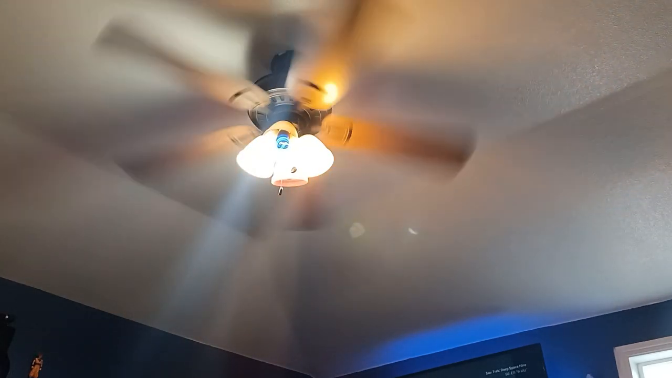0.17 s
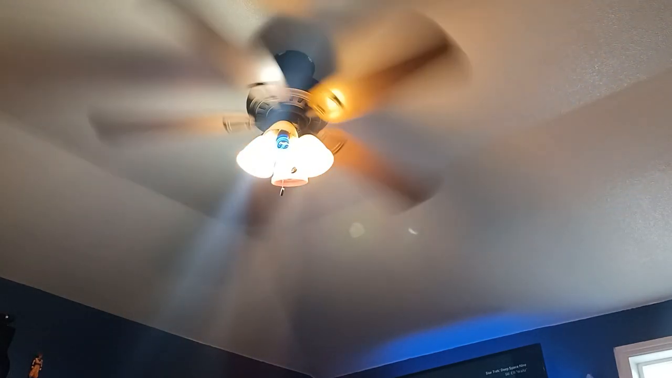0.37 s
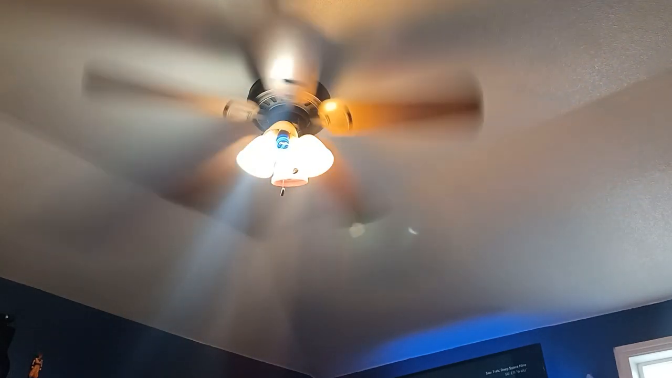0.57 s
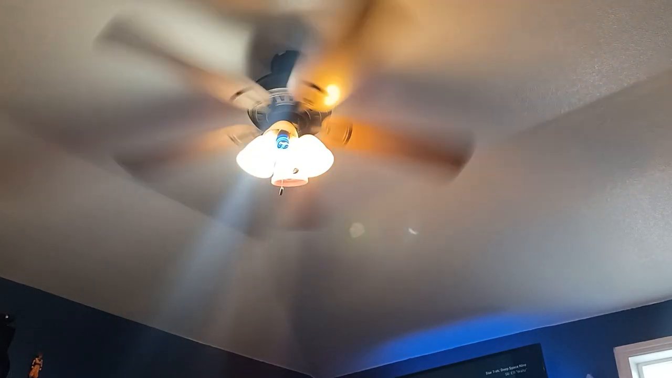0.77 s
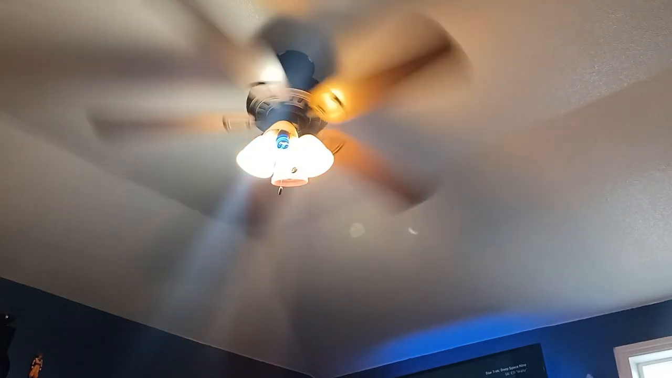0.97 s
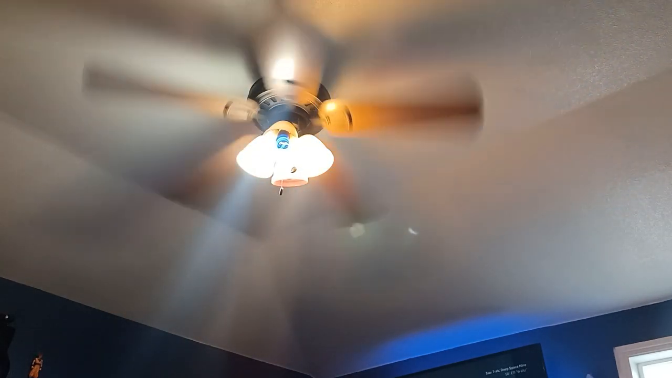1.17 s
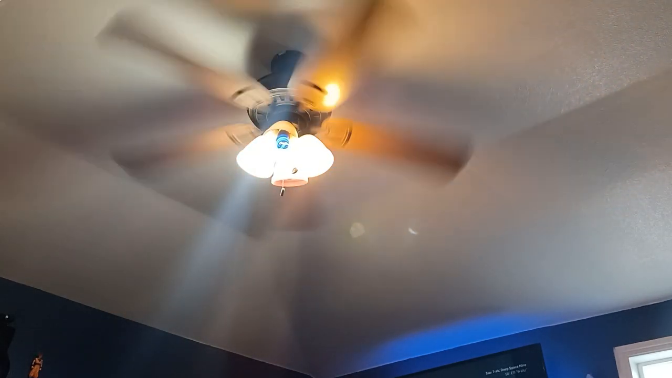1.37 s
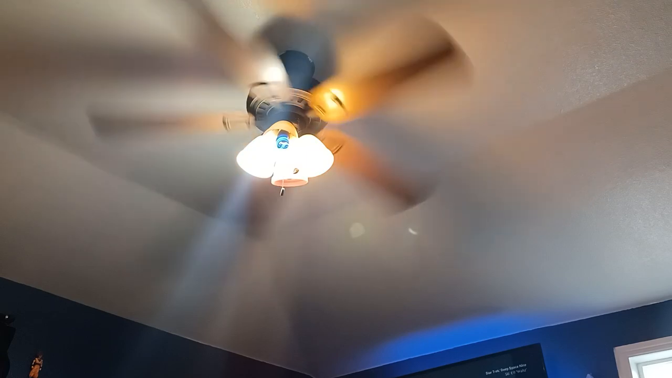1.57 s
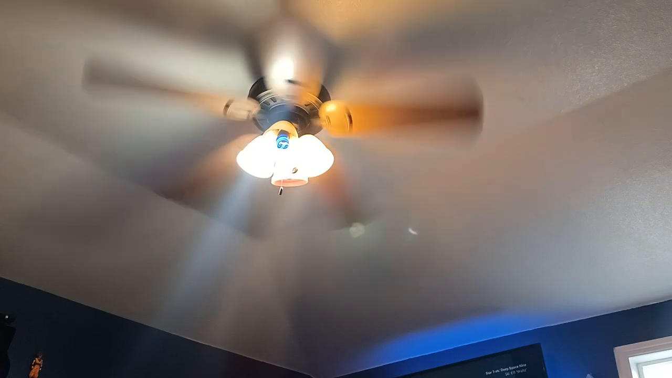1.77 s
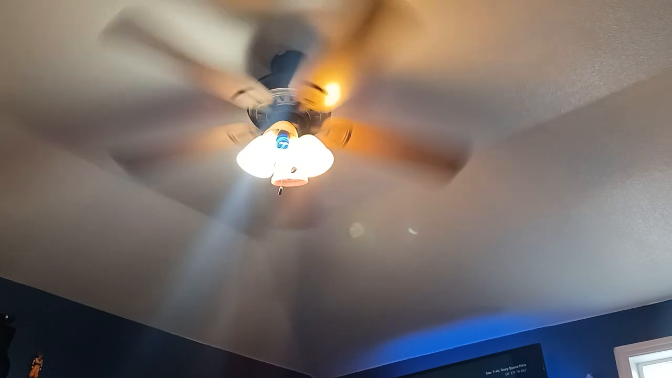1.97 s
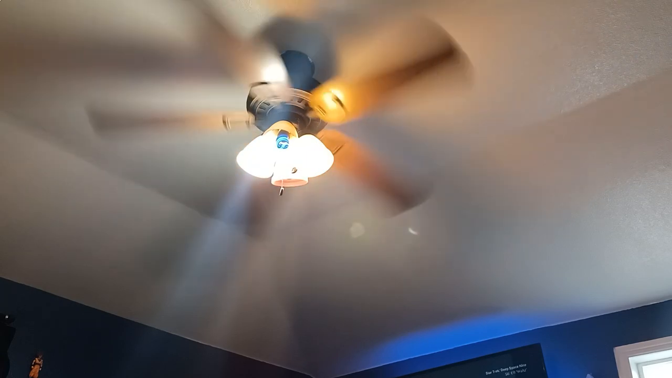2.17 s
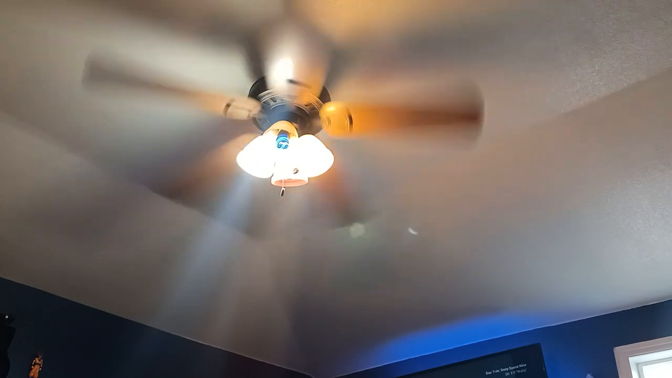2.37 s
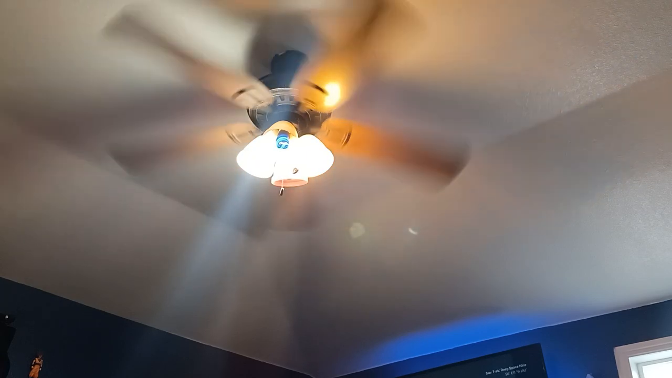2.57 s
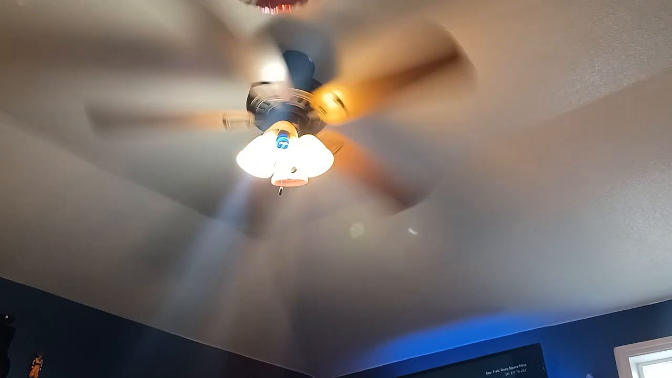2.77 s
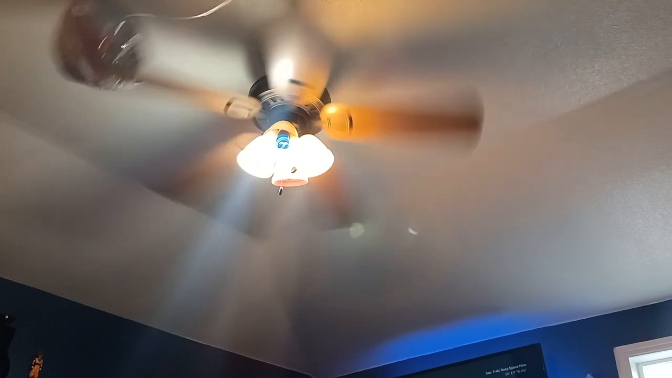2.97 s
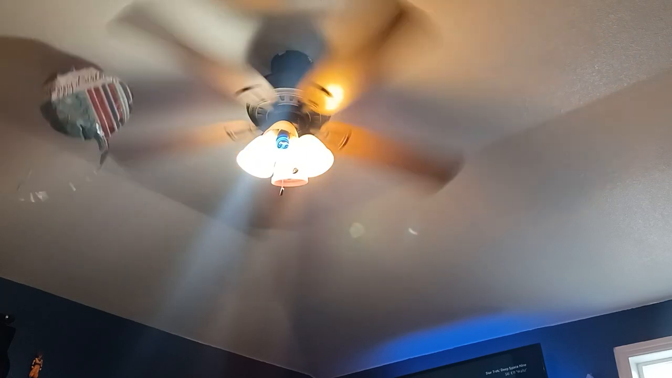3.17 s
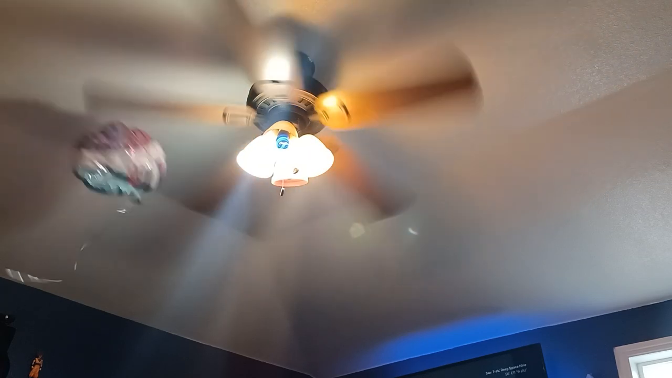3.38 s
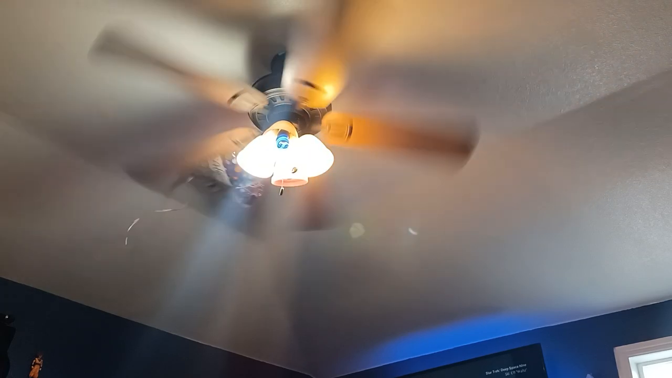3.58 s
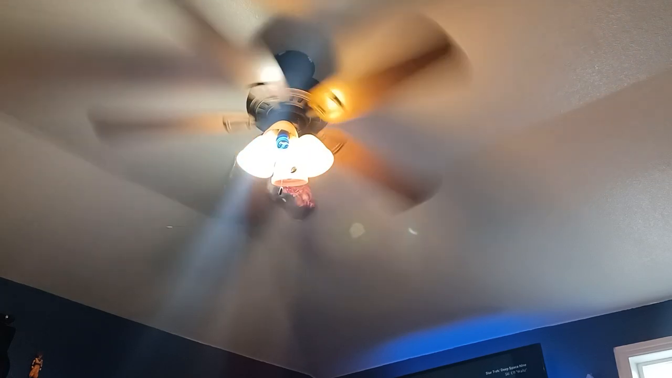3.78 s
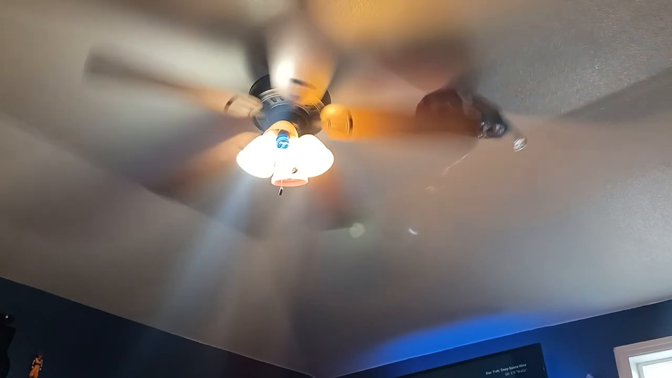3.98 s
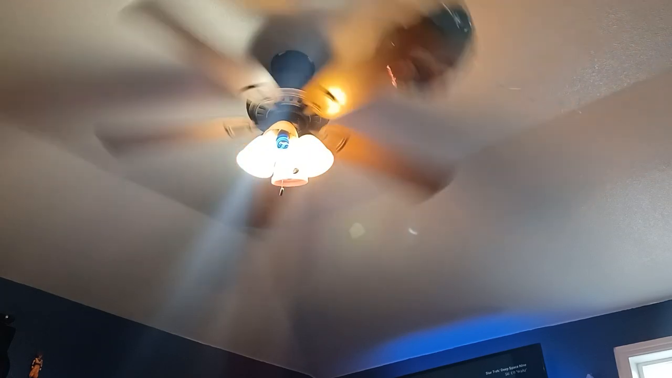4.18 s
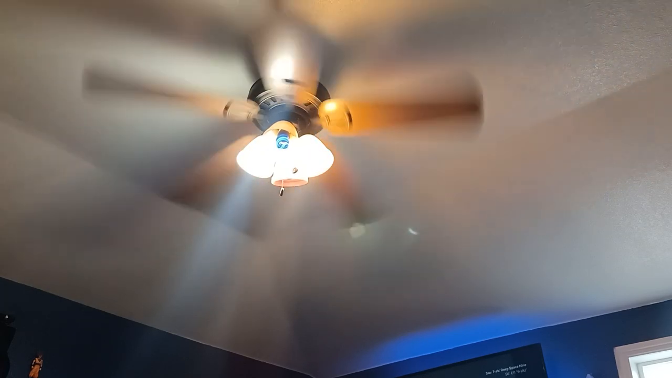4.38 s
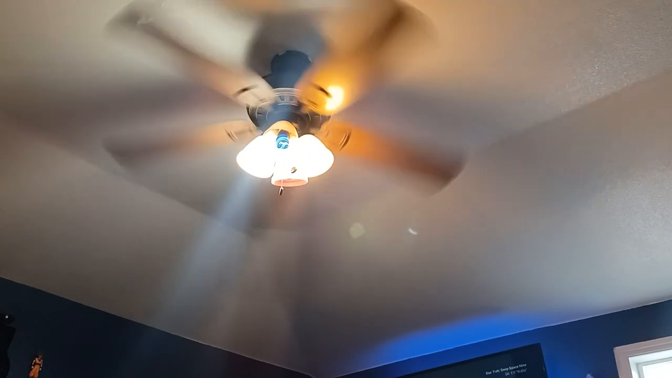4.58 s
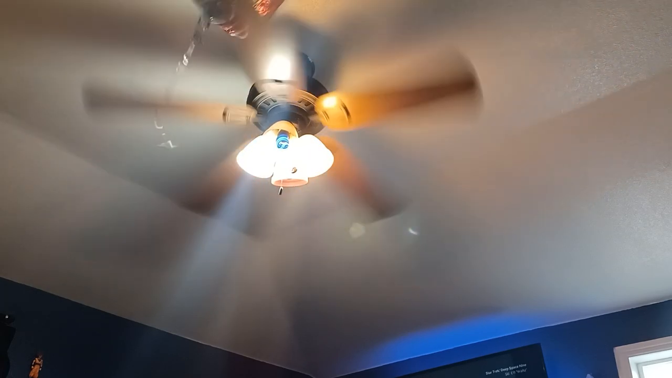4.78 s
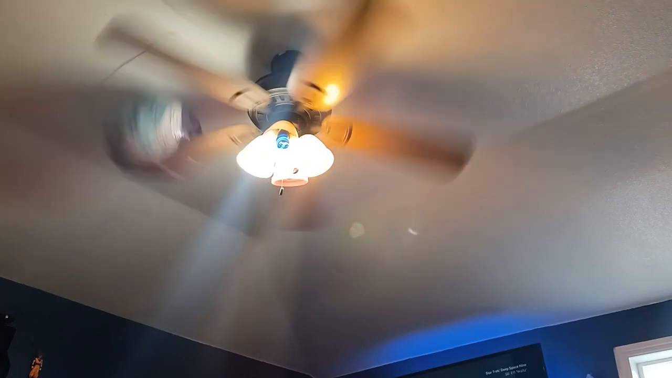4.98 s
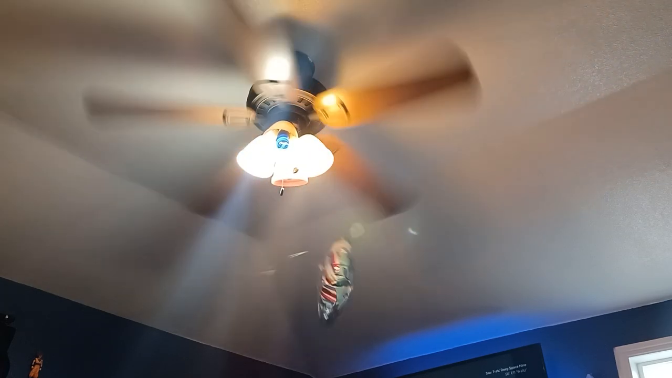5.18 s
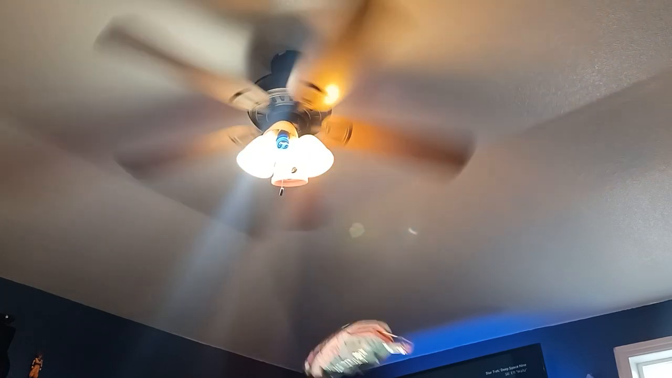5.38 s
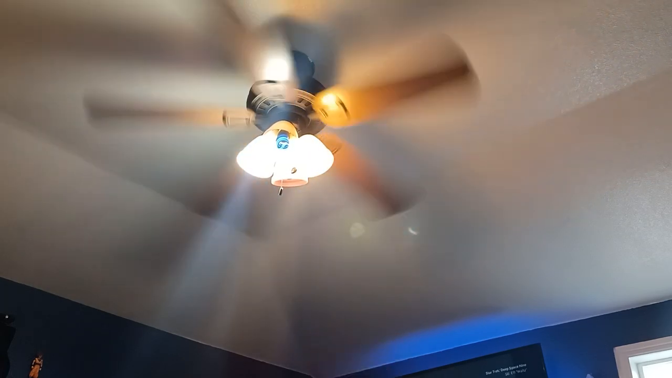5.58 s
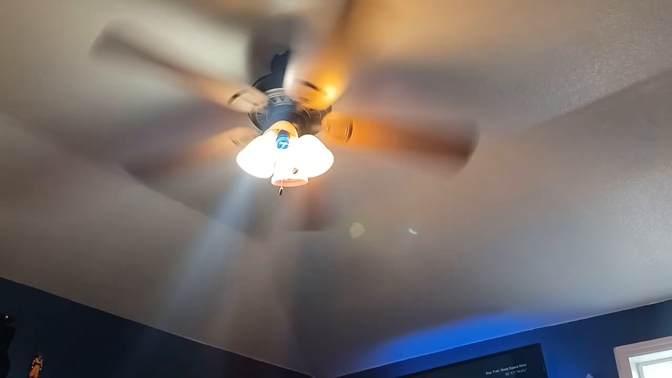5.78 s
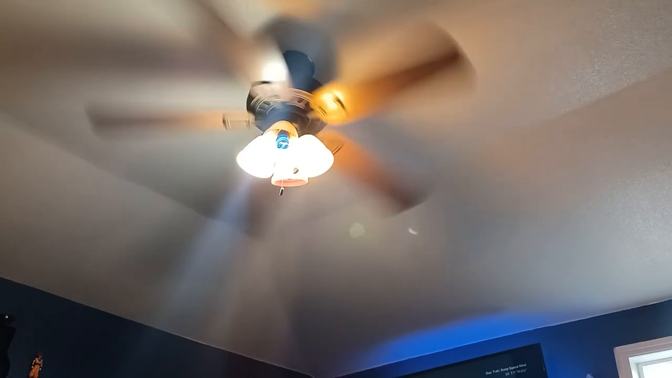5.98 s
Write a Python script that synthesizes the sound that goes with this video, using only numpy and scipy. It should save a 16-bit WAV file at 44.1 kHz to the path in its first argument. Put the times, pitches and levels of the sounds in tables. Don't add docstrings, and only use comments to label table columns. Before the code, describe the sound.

A faint low fan hum and soft air rush run throughout in a small bedroom, heard by a handheld phone. At 0.1 s a dull dry scuff and handling thump, then foil rustles until 0.3 s and a tiny bright tick at 0.35. Sparse ticks and a small snap at 0.8 lead to denser crinkling at 1.0-1.5 and again at 1.85-2.1 s, followed by faint sliding hiss. Light grazes begin at 2.7; at 2.85-3.0 the blades strike in a loud, sharp crackling volley with hollow booms. More smacks come at 3.35-3.5, 3.7-3.85 and 4.0, then a deep, strong whack at 4.17 with a weaker slap at 4.3. Thin crinkles fill 4.4-4.7, a last hard double burst lands at 4.8-4.95, and light grazes follow at 5.05-5.16. Faint rustling and hiss around 5.4-5.6 sink into near-silent fan murmur by 6 s.

```python
import sys
import numpy as np
from scipy import signal
from scipy.fft import rfft, irfft, next_fast_len
from scipy.io import wavfile
from scipy.ndimage import uniform_filter1d

SR = 44100
rng = np.random.default_rng(int(sys.argv[2]) if len(sys.argv) > 2 else 0)


def file_out(sig):
    cols = np.atleast_2d(sig).T
    lim = np.clip(cols, -1, 1)
    pcm = np.round(lim * 32767).astype(np.int16)
    wavfile.write(sys.argv[1], SR, pcm)


def field_ratio(decibels):
    return 10 ** (np.asarray(decibels, dtype=float) / 20)


N = 266672
SIZE = next_fast_len(N + SR)
HZ = np.maximum(np.arange(SIZE // 2 + 1) * SR / SIZE, 1)


def rms_one(x):
    return x / np.sqrt(np.mean(x ** 2) + 1e-20)


def at_hz(points, hz=HZ):
    freqs, values = np.transpose(points)
    return np.interp(np.log(hz), np.log(freqs), values)


def at_time(points, t):
    return np.interp(t, *np.transpose(points))


def band_pass(x, order, low_hz, high_hz):
    sos = signal.butter(order, [low_hz, high_hz], "band", fs=SR, output="sos")
    return signal.sosfilt(sos, x)


def colour(x, spectrum):
    return irfft(rfft(x, SIZE) * rms_one(field_ratio(at_hz(spectrum))), SIZE)[..., :N]


def resonance(x, hz, width_hz):
    r = np.exp(-np.pi * width_hz / SR)
    gain = (1 - r * r) / 2
    return signal.lfilter([gain, 0, -gain], [1, -2 * r * np.cos(2 * np.pi * hz / SR), r * r], x + 1e-18)


def drift(rate):
    steps = rng.standard_normal(400)
    return np.interp(np.arange(N) / SR * rate, np.arange(400), steps)


def diffuse(count, size=SIZE):
    # (frequency [Hz], left-right coherence [0 to 1])
    likeness = [(60, 0.9), (200, 0.98), (500, 0.78), (1000, 0.28), (2000, 0.0088), (12000, 0.0086)]
    mid, side = rfft(rng.standard_normal((2, count)), size)
    alike = np.clip(at_hz(likeness, np.arange(1, size // 2 + 2) * SR / size), 0, 1)
    spectra = np.sqrt(1 + alike) * mid + np.sqrt(1 - alike) * side * [[1], [-1]]
    return irfft(spectra, size)[:, :count] / np.sqrt(2)


def sides(pan_db):
    return field_ratio(np.array([[pan_db / 2], [-pan_db / 2]]))


def grains(per_s, spread_db, apart):
    sizes = field_ratio(spread_db * np.minimum(rng.exponential(1, (3, N)), 4)) * rng.choice([-1, 1], (3, N))
    clicks = sizes * (rng.random((3, N)) < per_s / SR)
    return rms_one(clicks[0] + apart * clicks[1:])


def contacts():
    # (time [s], skin level [dB], crinkle above skin [dB], length [s])
    rustles = [(0.068, -54, -6, 0.023), (0.167, -30.5, -10.5, 0.052), (0.211, -26.5, -12, 0.023),
               (0.235, -33.5, -8.5, 0.1), (0.432, -48.5, -3.5, 0.09), (0.587, -62, 2, 0.11),
               (0.819, -41.5, -34, 0.0054), (0.849, -42, -41, 0.0097), (0.91, -51.5, -43, 0.038),
               (1.037, -53, -8, 0.019), (1.063, -53.5, -4, 0.028), (1.195, -44.5, 1.5, 0.027),
               (1.211, -35, -5.5, 0.062), (1.293, -37.5, -0.5, 0.019), (1.372, -43.5, -1.5, 0.038),
               (1.452, -42.5, -32, 0.0081), (1.498, -66, 0, 0.088), (1.86, -42.5, -28, 0.024),
               (1.884, -42.5, -5.5, 0.045), (1.943, -38.5, -3, 0.11), (2.087, -37.5, -13, 0.013),
               (2.23, -58, -6, 0.091), (2.423, -54.5, -13, 0.07), (2.56, -54.5, -28.5, 0.077),
               (2.646, -45.5, -26, 0.028), (3.075, -40.5, -5, 0.042), (3.154, -54, 3.5, 0.044),
               (3.274, -53, -1, 0.03), (4.393, -40, -6.5, 0.05), (4.566, -55, 2.5, 0.014),
               (5.398, -57.5, -15, 0.073), (5.485, -59, -14.5, 0.076), (5.583, -69, -23, 0.056)]
    # (time [s], skin level [dB], thump above skin [dB], length [s])
    blows = [(2.703, -32, -14, 0.031), (2.774, -32.5, -24, 0.038), (2.847, -12, -22, 0.025),
             (2.923, -13, -15, 0.025), (2.961, -14, -10.5, 0.034), (3.353, -9, -9, 0.002),
             (3.427, -12, -23, 0.016), (3.461, -11.5, -20.5, 0.016), (3.724, -20.5, -12, 0.025),
             (3.795, -21.5, -7, 0.018), (3.814, -11, -11, 0.021), (3.847, -21.5, -9, 0.034),
             (3.95, -30.5, -3.5, 0.012), (3.991, -15, -33.5, 0.0078), (4.086, -34.5, -12.5, 0.021),
             (4.158, -18, -2, 0.0098), (4.168, -8, -7, 0.017), (4.223, -27, -9.5, 0.006),
             (4.319, -25, -19, 0.011), (4.588, -37, -9, 0.019), (4.615, -35.5, -26.5, 0.058),
             (4.71, -31, -22.5, 0.042), (4.807, -14, -16.5, 0.016), (4.9, -10.5, -6, 0.026),
             (4.923, -19.5, -8, 0.04), (5.058, -29.5, -10.5, 0.062), (5.151, -33, -23, 0.015),
             (5.159, -24, -25, 0.022)]
    # (time [s], level [dB])
    slack = [(2.7, 3), (2.77, -7), (2.85, 4), (2.93, -0.5), (2.97, -3.5), (3.35, 2), (3.43, 4.5),
             (3.47, -1), (3.72, 2), (3.81, -1.5), (3.99, 2.5), (4.08, 5), (4.16, -3.5), (4.32, 0.5),
             (4.6, 3.5), (4.8, 0.5), (4.9, -0.5), (5.15, 1.5)]
    # (time [s], left over right [dB])
    place = [(0, -8), (0.5, -2), (0.9, -1.5), (2.0, -0.5), (3.0, -4), (3.5, -3.6), (4.2, -3), (5.2, -3.5),
             (6.05, -1.5)]
    faint_from_db, faint_pan, faint_thump = -39.5, 0.18, 0.13
    rustle_thump_db = -14.5
    blow_crinkle_db, crinkle_lags = -19.5, 0.21
    rows = []
    for s, db, crinkle_db, length in rustles:
        thump_db = rustle_thump_db + faint_thump * max(faint_from_db - db, 0)
        rows.append((s, db, thump_db, crinkle_db, length))
    for s, db, thump_db, length in blows:
        crinkle_db = blow_crinkle_db - crinkle_lags * db + at_time(slack, s)
        rows.append((s, db, thump_db, crinkle_db, length))
    return [(s, db, thump_db, crinkle_db,
             at_time(place, s) + faint_pan * max(faint_from_db - db, 0), length)
            for s, db, thump_db, crinkle_db, length in rows]


def wash(fall_s):
    rise_s, follows = 0.005, 0.85
    t, power = np.arange(0, N, 64) / SR, 1e-14
    for s, skin_db, *_, length in contacts():
        since = np.maximum(t - s, 0)
        shape = (1 - np.exp(-since / rise_s)) ** 2 * np.exp(-since / fall_s)
        power = power + field_ratio(2 * skin_db) * length / 0.029 * shape
    return np.interp(np.arange(N) / SR, t, power ** (follows / 2))


def fan():
    # (time [s], level [dB])
    passed_points = [(0, 5), (0.4, 3), (0.64, 5.5), (0.96, 1), (1.33, 4.5), (1.6, 3.5), (1.83, 5.5),
                     (2.05, 11), (2.3, 1.5), (2.75, 4), (3.2, 8.5), (3.6, -6.5), (4.2, -9), (4.5, 5.5),
                     (5.25, -4.5), (5.66, -4.5), (6.05, -8)]
    # (time [s], peak level [dB], half length [s])
    drone_swells = [
        (0.01, -58, 0.073),
        (0.62, -59, 0.22),
        (1.335, -51.5, 0.1),
        (2.046, -57.5, 0.079),
        (2.5, -64, 0.095),
        (2.726, -62, 0.042),
        (3.31, -55.5, 0.067),
        (3.596, -48.5, 0.025),
        (5.513, -60, 0.036),
    ]
    # (frequency [Hz], density [dB per Hz])
    air_spectrum = [(15, -53.5), (25, -39), (65, -13), (108, -10), (137, -5.5), (168, -6.5), (231, 1.5),
                    (547, -10.5), (642, -19.5), (1190, -16), (3000, -39), (3900, -64.5), (6600, -120)]
    # (frequency [Hz], density [dB per Hz])
    hiss_spectrum = [(1500, -26), (2300, -10.5), (3400, -13.5), (4300, -6), (6300, -11), (7200, -14),
                     (11800, -20), (15800, -11)]
    t = np.arange(N) / SR
    passed_db, swell = at_time(passed_points, t), wash(fall_s=0.034)

    hum_db = -62.5 + 0.24 * passed_db - 6 * np.clip((t - 2.95) / 0.17, 0, 1)
    hum = np.sqrt(2) * np.sin(2 * np.pi * 121 * t + 0.36 * drift(12.0))
    hum = field_ratio(hum_db + 3.5 * drift(29)) * hum

    noise = diffuse(N)
    drone = rms_one(resonance(resonance(noise, 229, 28), 229, 28))
    swells = sum(field_ratio(db) * np.exp(-((t - s) / half) ** 2) for s, db, half in drone_swells)
    drone = np.hypot(field_ratio(-80 + passed_db) + swells, field_ratio(-45) * swell) * drone

    air_gain = np.hypot(field_ratio(-61.5 + passed_db), field_ratio(-20.5) * swell)
    air = air_gain * field_ratio(2 * drift(8.8)) * colour(noise, air_spectrum)

    settling = field_ratio(-53) * wash(fall_s=0.01) ** .5
    hiss_gain = np.hypot(field_ratio(-75.5 + 1.5 * passed_db), field_ratio(-17.5) * swell + settling)
    hiss = hiss_gain * field_ratio(2 * drift(2.47)) * colour(diffuse(N), hiss_spectrum)
    return hum + drone + air + hiss


def scuffs():
    # (time [s], peak level [dB])
    jerks = [
        (0.07, -31.5),
        (0.077, -33.5),
        (0.093, -38),
        (0.107, -41.5),
        (0.124, -51),
    ]
    envelope = np.zeros(N)
    for s, peak_db in jerks:
        t, at = np.arange(SR // 10) / SR, round(s * SR)
        envelope[at:at + len(t)] += field_ratio(peak_db - 17.5) * np.exp(-t / 0.037)
    return 4 * band_pass(envelope * grains(2900, 2.7, apart=0.57), 4, 350, 1300)


def ribbon():
    # (time [s], level [dB], length [s])
    slides = [
        (0.06, -61, 0.063),
        (1.597, -68, 0.079),
        (2.263, -62.5, 0.14),
        (2.426, -65, 0.074),
        (2.65, -78, 0.046),
        (5.428, -64.5, 0.16),
    ]
    t = np.arange(N) / SR
    envelope = 0
    for s, db, length in slides:
        shape = np.clip(np.minimum((t - s) / 0.014, (s + length - t) / 0.07 + 1), 0, 1)
        envelope = envelope + field_ratio(db) * shape ** 2
    hiss = rms_one(band_pass(rng.standard_normal((2, N)), 4, 4400, 6900))
    return envelope * field_ratio(2 * drift(30)) * hiss


def brushes():
    # (time [s], level [dB], top frequency [Hz], length [s])
    passes = [(0.815, -49.5, 3800, 0.033), (1.063, -54, 6500, 0.043), (1.86, -46.5, 3150, 0.074),
              (1.947, -45.5, 3370, 0.066), (2.025, -49, 3470, 0.08), (1.223, -45, 3500, 0.096),
              (2.304, -70, 2000, 0.28), (2.929, -25, 2200, 0.026), (3.196, -64, 2000, 0.055),
              (3.43, -29.5, 2200, 0.045), (4.031, -41, 2200, 0.037), (4.446, -62, 2200, 0.12),
              (4.896, -24, 2150, 0.023), (5.102, -42, 1800, 0.034), (4.59, -62, 2200, 0.08),
              (5.396, -70, 1900, 0.14)]
    out, crackle = np.zeros((2, N)), grains(6000, 2.8, apart=2.3)
    for s, db, top_hz, length in passes:
        t, at = np.arange(SR // 3) / SR, round(s * SR)
        shape = np.minimum(t / (0.48 * length), 1) * np.exp(-np.maximum(t - length, 0) / 0.056)
        muffled = rms_one(band_pass(crackle[:, at:at + len(t)], 3, 500, top_hz))
        out[:, at:at + len(t)] += field_ratio(db) * shape * muffled
    return out * sides(2.56)


def knocks():
    # (time [s], peak level [dB], frequency [Hz])
    pushes = [(0.093, -39.5, 128), (0.218, -41, 83.5), (1.058, -37.5, 108), (1.08, -41.5, 131),
              (1.1, -44, 83.5), (1.23, -47, 78), (1.3, -45, 116), (1.35, -51.5, 78), (2.861, -51.5, 125),
              (2.987, -29.5, 122.6), (3.354, -37.5, 68.6), (3.46, -33.5, 79.8), (3.485, -33, 76),
              (3.52, -40.5, 76), (3.826, -35, 85), (4.174, -38, 69), (4.904, -36, 88.5),
              (5.18, -52.5, 100.9)]
    out = np.zeros(N)
    rumble = rms_one(band_pass(rng.standard_normal(N), 3, 60, 210))
    for s, peak_db, hz in pushes:
        t, at = np.arange(SR // 4) / SR, round(s * SR)
        turns = hz * (t + 0.0033 * (1 - np.exp(-t / 0.023)))
        body = np.sin(2 * np.pi * turns) + 2.3 * rumble[at:at + len(t)]
        out[at:at + len(t)] += field_ratio(peak_db + 10.0) * t / 0.078 * np.exp(-t / 0.015) * body
    return out


def booms():
    # (time [s], peak level [dB])
    hits = [(2.858, -34.5), (2.945, -17), (2.979, -22), (3.011, -23.5), (3.351, -24.5), (3.431, -23.5),
            (3.46, -18.5), (3.505, -26), (3.73, -33), (3.8, -33), (3.82, -16), (4.169, -12), (4.206, -14.5),
            (4.814, -23.5), (4.903, -17), (4.92, -22), (4.941, -15)]
    out = np.zeros(N)
    for s, peak_db in hits:
        t, at = np.arange(SR // 3) / SR, round(s * SR)
        envelope = (1 - np.exp(-t / 0.0027)) * np.exp(-t / 0.032)
        out[at:at + len(t)] += field_ratio(peak_db) * envelope * np.sin(2 * np.pi * 228 * t)
    return out * sides(3.1)


def crumpling():
    # (frequency [Hz], width [Hz], level [dB])
    gas_modes = [(235, 15, 1), (289, 70, -1.5), (386, 240, -4), (522, 189, -3)]
    # (frequency [Hz], density [dB per Hz])
    skin_spectrum = [(150, -25.5), (300, -2.5), (600, -3), (900, -3.5), (1500, -4.5), (2050, -8),
                     (2400, -12), (3500, -16.5), (7000, -32.5), (12000, -48.5)]
    # (frequency [Hz], density [dB per Hz])
    crinkle_spectrum = [(880, -5.5), (1500, -1), (1880, 3), (2120, -2.5), (2410, 0), (4180, -3.5),
                        (6640, -1), (7700, -10.5), (12600, 1), (15800, -8.5)]
    power = np.zeros((3, 2, N))
    for s, skin_db, thump_db, crinkle_db, pan_db, length in contacts():
        length, at = max(length, .003), round(s * SR)
        t = np.arange(min(SR // 2, N - at)) / SR
        swell = np.minimum(t / (0.36 * length), 1) ** 0.49
        shape = swell * np.exp(-np.maximum(t - length, 0) / (0.013 + 0.5 * length))
        gains = field_ratio(skin_db + np.array([thump_db - 4.5, -9, crinkle_db + 1.5]))
        power[:, :, at:at + len(t)] += (gains[:, None, None] * sides(pan_db) * shape) ** 2
    thump, skin, crinkle = np.sqrt(power)
    push = thump * grains(1500, 3, apart=.05)
    gas = 0
    for k, (hz, width_hz, db) in enumerate(gas_modes):
        gas = gas + (-1) ** k * field_ratio(db + 25.5) * resonance(push, hz, width_hz)
    skin = colour(skin * grains(2500, 3.5, apart=.9), skin_spectrum)
    crinkle = colour(crinkle * grains(9000, 5.9, apart=1.0), crinkle_spectrum)
    return gas + skin + crinkle


def creases(table, offset_db, cycles, rough):
    out, chance = np.zeros((2, N)), rng.standard_normal((len(table), 400))
    t = np.arange(400) / SR
    for (s, peak_db, hz, pan_db), luck in zip(table, chance):
        turns, at = t * hz, round(s * SR)
        pulse = np.sin(2 * np.pi * turns) * turns / cycles * np.exp(1 - turns / cycles)
        followers = rough * luck ** 3 * np.sqrt(hz / SR) * np.exp(-t / .0025)
        pulse = pulse + np.convolve(pulse, followers)[:400]
        out[:, at:at + 400] -= field_ratio(peak_db + offset_db) * sides(pan_db) * pulse
    return out


def reflections():
    # (frequency [Hz], decay time to -60 dB [s])
    room_t60 = [(100, 0.13), (250, 0.24), (1000, 0.43), (4000, 0.47), (14000, 0.31)]
    count = SR // 2
    t, tail, noise = np.arange(count) / SR, 0, rfft(diffuse(count, count))
    octaves = np.log2(np.clip(np.arange(count // 2 + 1) * SR / count, 60, 15360) / 60)
    for k in range(9):
        band = irfft(noise * np.maximum(1 - abs(octaves - k), 0), count)
        tail = tail + band * field_ratio(-60 * t / at_hz(room_t60, 60 * 2 ** k))
    tail = tail * np.clip((t - .003) / 0.0035, 0, 1)
    return field_ratio(-1.5) * rfft(tail / np.sqrt(np.sum(tail ** 2) / 2), SIZE)


def in_room(dry, echo=1):
    # (time [s], lag of the left port [s])
    left_lag = [(0, 0.00051), (2.5, 0.00019), (3.2, 0.00025), (4, 0.00014), (4.9, 0.00022), (6, 0.000095)]
    out, places = 0, np.linspace(0, N / SR, 13 if echo else 5)
    for s in places:
        here = np.maximum(1 - abs(np.arange(N) / SR - s) / places[1], 0)
        lag = at_time(left_lag, s) * HZ / np.hypot(HZ, 350)
        late = np.exp(-2j * np.pi * HZ * lag * [[1], [0]])
        out = out + rfft(dry * here, SIZE) * late * (1 + (reflections() if echo else 0))
    return irfft(out, SIZE)[:, :N]


def balloon():
    # (time [s], peak level [dB], ring frequency [Hz], left over right [dB])
    snap_events = [(0.819, -25, 1450, -2), (0.826, -37, 1270, 9), (0.842, -47, 2800, 6),
                   (1.232, -27, 2340, 7), (1.289, -33, 690, -2), (2.709, -35.5, 1363, 17),
                   (2.854, -16.5, 1500, 9.5), (2.865, -28, 710, -5.5), (2.8672, -28, 1118, 6),
                   (2.881, -16.5, 1200, 10.5), (2.9095, -31, 1120, 6), (2.9283, -14.5, 1608, 11.5),
                   (2.936, -8, 1200, 10.5), (2.944, -15, 1312, 7.5), (2.956, -12, 1408, 8),
                   (2.9596, -16.5, 1485, 3.5), (2.971, -23.5, 1077, 7.5), (2.983, -15.5, 1088, 5),
                   (2.998, -23.5, 800, 2.5), (3.04, -24, 1000, 4.5), (3.3516, -11.5, 910, 2),
                   (3.378, -21.5, 894, 2), (3.4308, -15.5, 960, 9), (3.4402, -19.5, 800, 6),
                   (3.448, -18.5, 1000, 5), (3.4492, -17.5, 1770, 22), (3.5177, -16.5, 900, -4),
                   (3.7305, -22.5, 940, 1.5), (3.7474, -26, 890, -2.5), (3.8172, -8.5, 629, 0.5),
                   (3.8286, -15, 1000, 12.5), (3.8335, -24, 602, 9.5), (3.8365, -22, 698, -2),
                   (3.862, -20, 900, 4.5), (3.999, -16.5, 1200, 6.5), (4.0103, -27.5, 1205, 1),
                   (4.1633, -20, 899, 8), (4.1757, -11, 1500, 14), (4.2264, -23, 900, 11),
                   (4.3165, -27.5, 1100, 8.5), (4.706, -26.5, 1500, 5), (4.726, -32.5, 1230, 13),
                   (4.812, -18.5, 1088, 5.5), (4.822, -30.5, 698, 1.5), (4.902, -17.5, 1212, 10.5),
                   (4.9186, -19.5, 900, 3), (4.9248, -12.5, 1110, 8.5), (4.932, -20, 1000, -5),
                   (4.937, -18, 1000, 9), (5.164, -39, 1265, 1)]
    # (time [s], peak level [dB], ring frequency [Hz], left over right [dB])
    tick_events = [(0.0712, -49, 2020, 2), (0.355, -13, 12350, 0), (0.4968, -27.5, 4120, 6),
                   (0.601, -34, 4080, 7), (0.6384, -42, 4400, -18), (0.935, -35.5, 4400, -5),
                   (1.0364, -40, 4500, 1), (1.049, -32, 4800, 0), (1.0714, -29, 5890, -11),
                   (1.0814, -30, 7500, -7), (1.1747, -31, 4250, 9), (1.3676, -22.5, 2930, 5),
                   (1.3682, -15, 13300, -7), (1.3748, -19, 12400, 9), (1.3812, -23, 13500, 0),
                   (1.3997, -16.5, 13000, 13.5), (1.4361, -23, 13300, -4), (1.4567, -31, 2300, 10),
                   (1.4575, -25, 12000, -2), (1.522, -38, 12000, 0), (1.534, -26.5, 14100, 2),
                   (1.693, -40, 9000, -3), (1.7535, -48, 4000, 6), (1.815, -60, 3500, 5),
                   (1.8925, -19, 12500, 3), (1.8916, -37, 2740, 17), (1.9165, -27, 6750, -4),
                   (1.917, -33, 2500, 8), (1.9764, -18, 12900, 1), (2.0064, -14, 13040, 0.5),
                   (2.031, -13, 12360, -4), (2.0494, -17, 4520, 6), (2.214, -36, 14500, 0),
                   (2.293, -35, 11000, -2), (2.4844, -36, 11640, -2), (2.592, -56, 5000, 0),
                   (2.708, -30, 12500, 3), (3.2803, -23, 12100, 3), (4.5625, -39, 5300, 7.5),
                   (4.6417, -34.5, 5270, 7.5)]
    # (time [s], peak level [dB], ring frequency [Hz],
    # left over right [dB])
    crack_events = [(0.742, -39, 9400, -8), (0.738, -48, 2200, 3), (0.8186, -37, 7000, -8),
                    (1.0705, -36, 12500, -2), (1.077, -38, 13000, -2), (1.222, -33, 14500, 0),
                    (1.252, -24, 13500, 0), (1.7535, -44, 9000, 2), (1.816, -48, 2200, 6),
                    (1.049, -42, 13500, -5), (1.091, -33, 11000, -2), (1.1189, -32, 9770, -6),
                    (1.1638, -35, 11300, -2), (1.1747, -44, 9500, 0), (1.917, -20, 11300, 0),
                    (1.94, -17, 14000, 0), (2.021, -23, 2600, 6), (2.0485, -19.5, 12500, 3),
                    (2.592, -48, 6000, -4), (2.8588, -5, 13600, 0), (2.8633, -16.5, 4200, 3.5),
                    (2.886, -8.5, 5400, 2.5), (2.9351, -26.5, 3580, 4), (2.9406, -3, 12700, 2),
                    (2.96, -22.5, 3040, 5.5), (3.2798, -40, 6900, 0), (3.318, -46, 5500, 1),
                    (3.3512, -5, 11900, 1.5), (3.43, -7, 13400, 3), (3.449, -15.5, 5500, -1.5),
                    (3.73, -17.5, 4520, -2), (3.7383, -20.5, 2540, 2), (3.8172, -9, 4800, -0.5),
                    (3.962, -30.5, 1200, 4.5), (4.0082, -20, 2770, -1), (4.187, -9, 13000, 0.5),
                    (4.319, -26.5, 4500, 1), (4.4242, -22.5, 5400, 5), (4.5624, -27, 11800, -2),
                    (4.5624, -44, 2500, 0), (4.5918, -35.5, 2060, 3), (4.6422, -27, 12600, -2),
                    (4.644, -27, 1500, 3), (4.7275, -19, 13200, 0), (4.7315, -34, 3040, 3)]
    snaps = creases(snap_events, offset_db=1.5, cycles=.45, rough=.06)
    ticks = creases(tick_events, offset_db=-3, cycles=0.35, rough=0.05)
    cracks = creases(crack_events, offset_db=-3, cycles=0.35, rough=0.05)
    foil = in_room(crumpling() + .35 * snaps + .12 * ticks)
    foil = foil + in_room(.85 * snaps + 1.2 * (ticks + cracks), echo=0)
    return signal.sosfilt(signal.butter(3, 130, "high", fs=SR, output="sos"), foil)


def scene():
    return fan() + scuffs() + ribbon() + brushes() + knocks() + booms() + balloon()


def gate(x):
    treble = irfft(rfft(x, SIZE) * HZ ** 2 / (HZ ** 2 + 1200 ** 2), SIZE)[:, :N]
    level_db = 10 * np.log10(uniform_filter1d(np.mean(treble ** 2, axis=0), size=700) + 1e-14)
    return x - treble * (1 - field_ratio(0.49 * np.clip(level_db + 35.5, -25, 0)))


def top_cut(x):
    return signal.sosfilt(signal.butter(12, 16970, fs=SR, output="sos"), x)


def record(dry):
    # (frequency [Hz], left over right [dB])
    left_over_right = [(40, -1.5), (70, 5), (125, -11.5), (250, 2.5), (500, 6), (1000, 8.5), (2000, 9),
                       (4000, -2.5), (8000, 3.5), (14000, 1)]
    # (frequency [Hz], width below [Hz], width above [Hz], depth [dB])
    port_dip = (7602, 299, 1301.5, -3)
    tilt = field_ratio(at_hz(left_over_right) / 2)
    dip_hz, below_hz, above_hz, dip_db = port_dip
    width_hz = np.where(HZ < dip_hz, below_hz, above_hz)
    dip = field_ratio(dip_db * np.exp(-((HZ - dip_hz) / width_hz) ** 2))
    x = gate(dry) + field_ratio(-86) * rng.standard_normal(dry.shape)
    x = irfft(rfft(x, SIZE) * np.array([tilt, 1 / tilt]) * dip, SIZE)
    x = x / (1 + abs(x / .95) ** 8) ** (1 / 8)
    passed = field_ratio(-50 * np.clip((HZ - 15650) / 480, 0, 1) ** 2) / np.sqrt(1 + (45 / HZ) ** 4)
    return top_cut(irfft(rfft(x) * passed, SIZE)[:, :N])


dry = scene()
out = record(dry)
file_out(out)
```